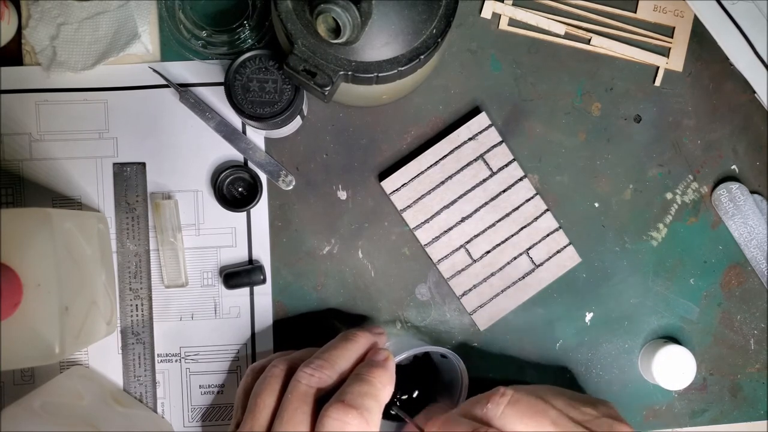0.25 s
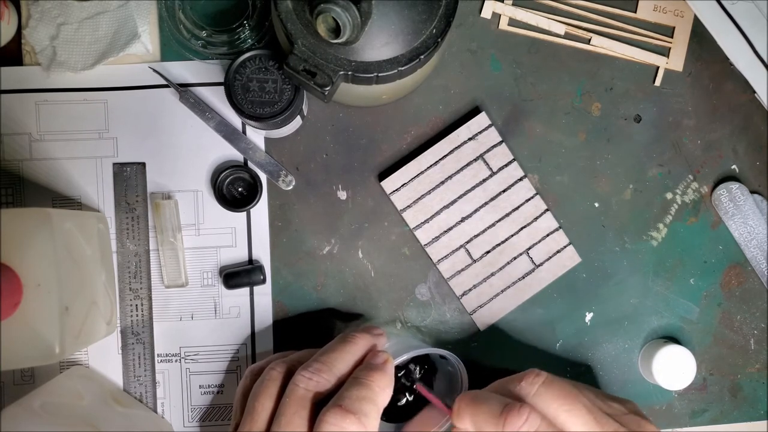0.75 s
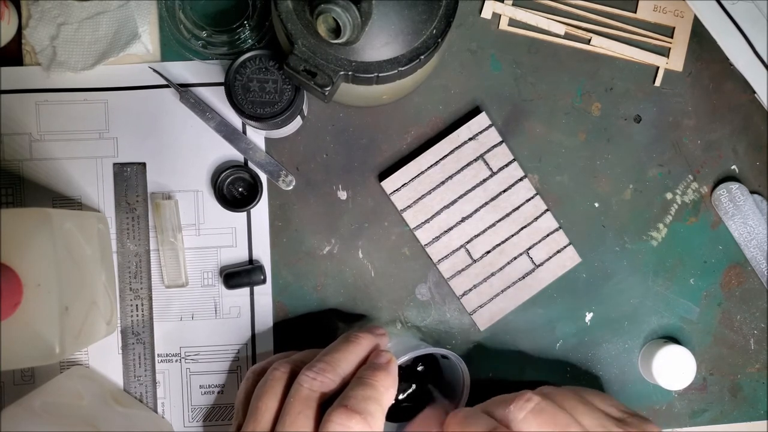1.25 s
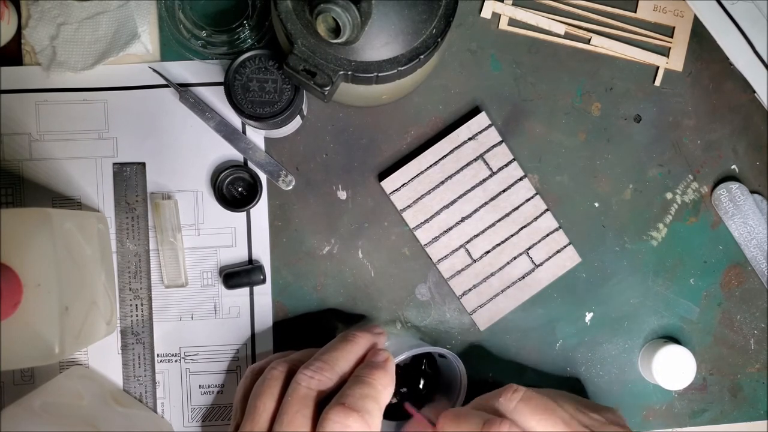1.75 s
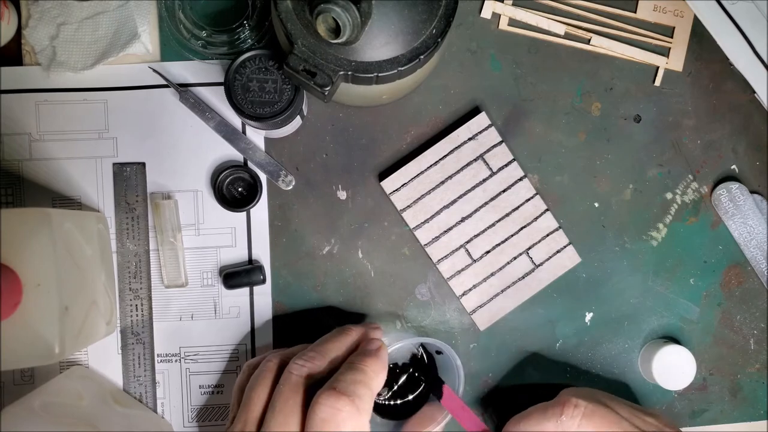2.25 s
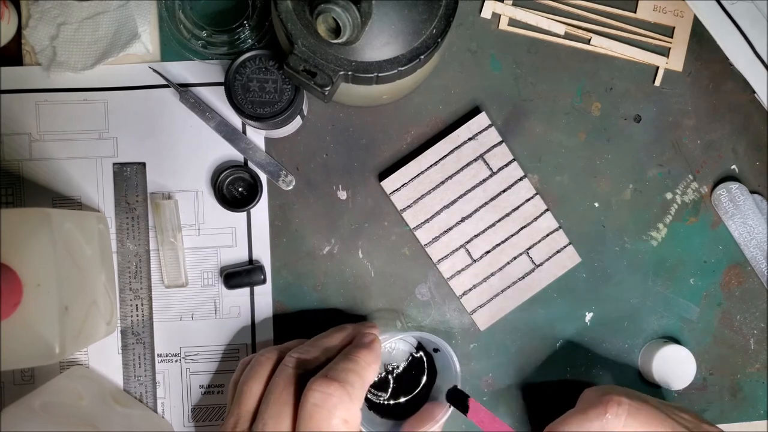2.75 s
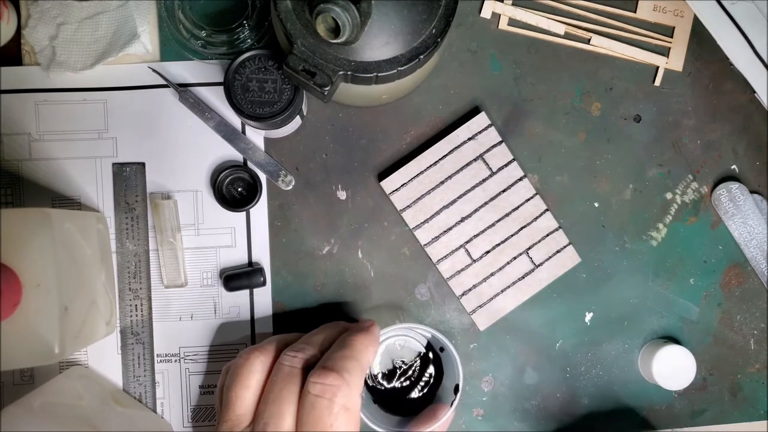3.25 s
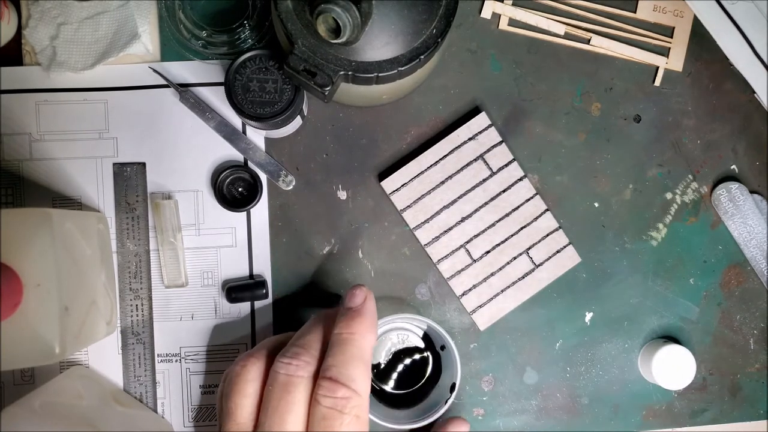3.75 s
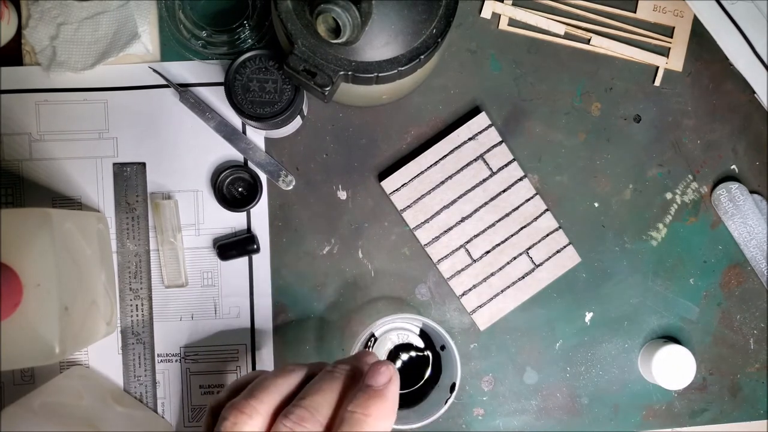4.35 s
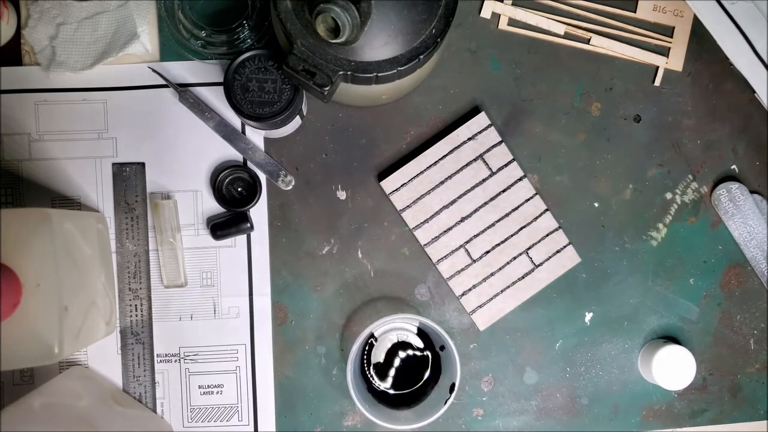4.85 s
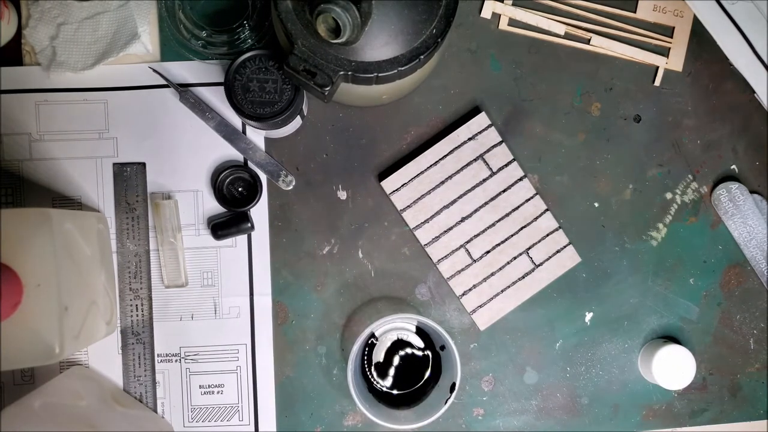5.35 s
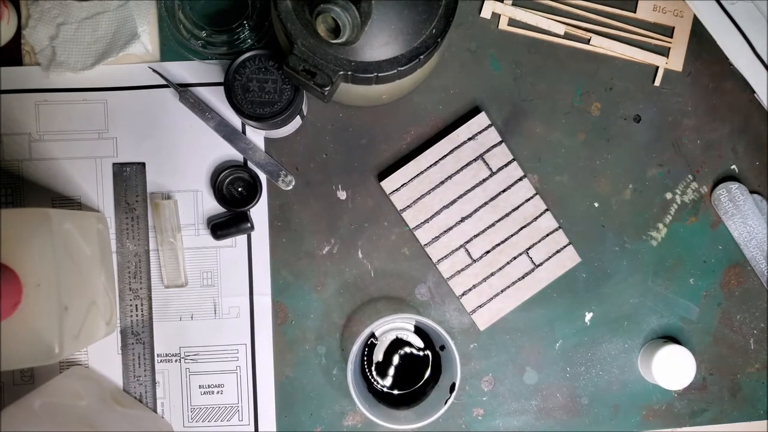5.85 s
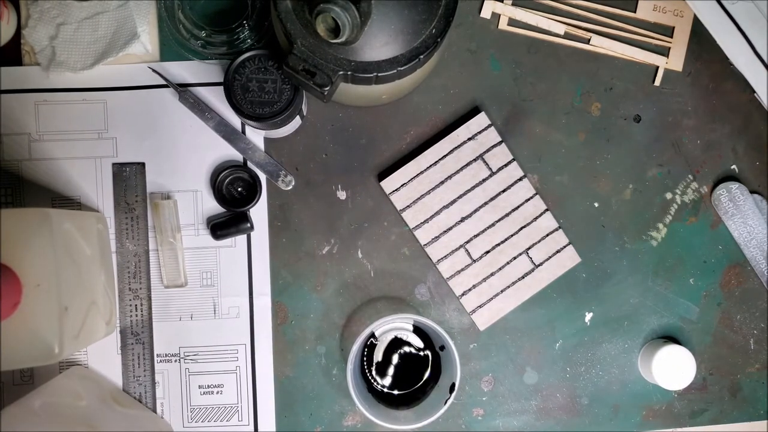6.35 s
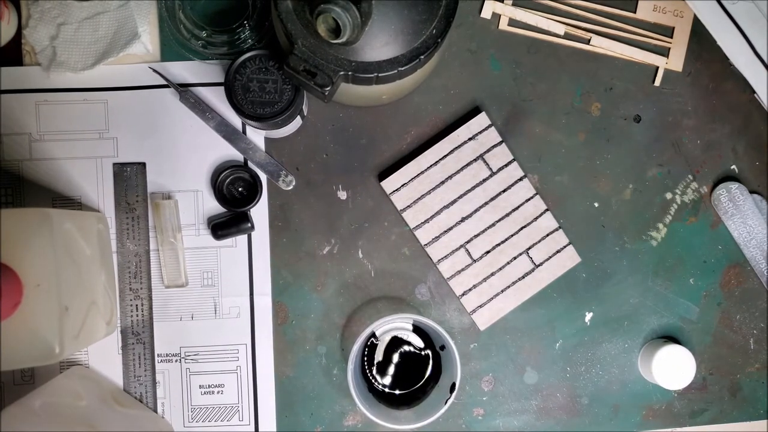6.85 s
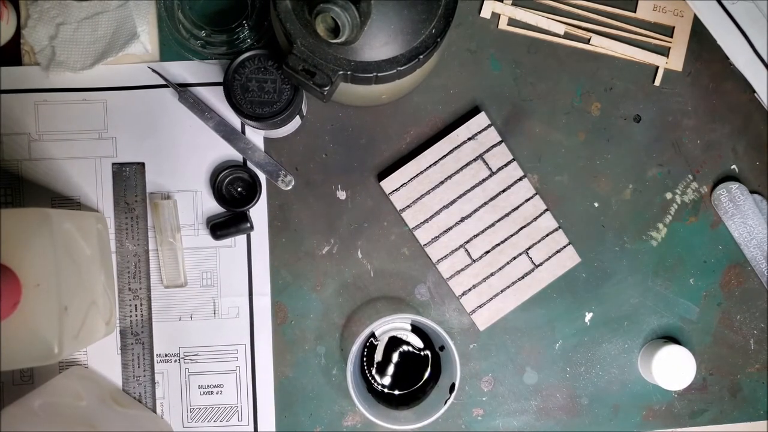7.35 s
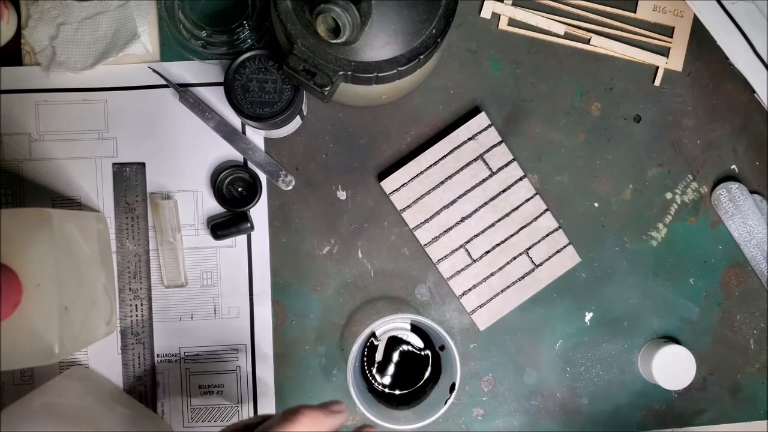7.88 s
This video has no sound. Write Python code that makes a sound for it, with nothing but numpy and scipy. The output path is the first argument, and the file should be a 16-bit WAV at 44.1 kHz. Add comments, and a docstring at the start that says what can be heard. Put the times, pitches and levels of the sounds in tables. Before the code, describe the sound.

Over the low, steady hum of a fan in a small workshop, a stirring stick knocks unevenly against a plastic paint cup close to the microphone. The tapping thins out and the stick lands with a sharp clack. After a short hollow click, small hard tools click on the left, and an object is put down on the bench with dull knocks, soft thumps and a slight metallic rattle.

```python
"""Stirring paint at the workbench

A stick stirs paint in a small plastic cup: damped pocks on wall and bottom, a wipe on the rim, then
a bounce as it is laid down. After a short, hollow click, small tools tick and something is set down
with a few dull knocks that ring the bench. Brief hisses swell, arms rock the bench top, and a faint
whine passes early on. A ventilation fan hums steadily in the small workshop."""
import sys
import numpy as np
from scipy import signal
from scipy.fft import rfft, irfft, next_fast_len
from scipy.io import wavfile

SR = 44100
rng = np.random.default_rng(int(sys.argv[2]) if len(sys.argv) > 2 else 0)


def log_audio(samples):
    """Write samples as a 16-bit WAV file to the path given in sys.argv[1]."""
    # one column per channel
    frames = np.atleast_2d(samples).T
    # limit to full scale, then quantise
    limited = np.clip(frames, -1, 1)
    pcm = np.round(limited * 32767).astype(np.int16)
    wavfile.write(sys.argv[1], SR, pcm)


N = 357856
TIME = np.arange(N) / SR
SHOT = TIME[:SR * 3 // 5]   # time axis of a one-shot, 0.6 s
ECHO_ONSET = np.clip(SHOT / .003 - 1, 0, 1)   # 3 ms of pre-delay, then a 3 ms fade-in


# the cup's body: f/Hz, swell/ms, level/dB when struck on the wall, on the bottom, on the rim
CUP_MODES = [(765, 1.2, -15.5, 1.5, -2.5), (1330, 1.06, -18.5, -6, -9), (1907, 1.53, -2.5, -9.5, -15),
             (2600, 1.3, -19, -24, -7), (3170, 2.4, -28, -40, -28)]
# the stick meets the wall, about four strokes a second; the spot sets the pitch, the grip the length:
# t/s, level/dB, tick against pock/dB, pitch ratio, length ratio
WALL_TAPS = [(0.1592, -22, -24, 0.89, 0.6), (0.2522, -49.5, -14, 1.02, 1.2),
             (0.3424, -18.5, -14, 0.95, 0.85), (0.3517, -28, -37, 0.95, 1.6),
             (0.4413, -34, -23, 0.97, 0.49), (0.634, -47, -3.5, 1.05, 0.5),
             (0.6381, -29.5, -30, 0.98, 0.98), (0.871, -55, -16, 0.93, 0.84),
             (1.033, -46.5, -18, 0.94, 1.8), (1.0634, -34, -5, 0.92, 1.4), (1.305, -35.5, -23, 0.97, 0.83),
             (1.5316, -35.5, -7.5, 1.01, 0.74), (1.725, -49, -35, 0.94, 1.6),
             (1.754, -48.5, -22, 0.97, 1.3), (1.933, -34.5, -19, 0.9, 0.95), (1.9721, -34, -14, 0.9, 0.51)]
# it lands on the bottom, under the paint: same columns
BOTTOM_TAPS = [(0.4641, -37.5, -14.5, 1.06, 0.71), (1.533, -45.5, -14, 0.94, 0.77),
               (1.544, -48, -25, 1.1, 1.15), (1.758, -48.5, -23, 0.7, 0.89), (1.953, -35, -15.5, 1.02, 1)]
# light touches on the rim as the stick is wiped and the cup nudged: same columns
RIM_TAPS = [(2.293, -58.5, 2.5, 0.91, 2.2), (2.321, -49.5, 0, 0.96, 1.9), (2.989, -51, -0.5, 0.98, 2.3),
            (3.141, -55, -16, 0.88, 1.9), (3.379, -63, 4.5, 0.63, 2.1), (3.43, -70.5, 11, 1.3, 1.3),
            (5.306, -54.5, -1, 0.78, 1.3)]

def cup_taps(trim_db=-2, pan_db=3.5):
    """Hand and paint damp the cup: each tap is a short pock with a hard tick. Returns both stems."""
    pocks, ticks = np.zeros((2, 2, N))
    mode_hz, swell_ms, *spot_db = np.transpose(CUP_MODES)
    low_cuts_hz = (950, 430, 400)   # the stiff wall gives less body than the bottom
    for taps, mode_db, low_hz in zip((WALL_TAPS, BOTTOM_TAPS, RIM_TAPS), spot_db, low_cuts_hz):
        for s, db, tick_db, pitch, length in taps:
            body = sum(from_db(gain_db) * damped_swing(hz * pitch, ms * length, rng.uniform(0, 2 * np.pi))
                       for hz, ms, gain_db in zip(mode_hz, swell_ms, mode_db))
            pock = band(body, low_hz, SR / 2, order=3)
            wall_ring = from_db(4) * resonate(pock, hz=1180, width_hz=130)   # the thin wall rings on
            pock = scatter(pock + wall_ring, early_db=-8, early_s=0.006)
            tick = resonate(contact(decay_s=0.0018)[0], hz=2400, width_hz=1600)
            tick = peak_one(band(tick, 600, 6000, order=3))
            tick = scatter(tick, early_db=-2.5, early_s=0.012)
            add(pocks, s, from_db(trim_db + db) * pock, pan_db)
            add(ticks, s, from_db(trim_db + db + tick_db) * tick, pan_db)
    return pocks, ticks


# stick or finger drags on the cup: centre t/s, half length/s, level/dB
SCRAPES = [(0, 0.074, -65), (.395, 0.036, -50.5), (1.06, 0.0028, -51), (2.33, 0.028, -72),
           (5.315, 0.012, -62.5)]
# the cup's hollow colour under a drag: f/Hz, width/Hz, level/dB
SCRAPE_MODES = [(1084, 210, -5.5), (2010, 200, -1.5), (2520, 530, -10.5)]

def cup_scrapes(grain_db=4):
    """Dragging sends tiny catches through the cup's hollow resonances."""
    catches = rng.standard_normal((2, N)) * from_db(grain_db * rng.standard_normal(N))
    hollow = sum(from_db(db) * rms_one(resonate_twice(catches, hz, width))
                 for hz, width, db in SCRAPE_MODES)
    out = np.zeros((2, N))
    add(out, 0, swells(SCRAPES) * hollow, pan_db=3)
    return out


# the stick's bounces: t/s, level/dB, pan left/dB, pitch ratio
STICK_HITS = [(3.2119, -22.5, 4.5, 0.96), (3.2141, -37, 8, 0.77), (3.2195, -40, -6, 1)]
# the bare stick's body: f/Hz, width/Hz, level/dB
STICK_MODES = [(656, 230, -6), (1560, 570, 3), (2620, 360, 0), (3270, 440, 1), (4400, 1300, -6),
               (5500, 800, 10.5), (6250, 1100, 6), (7610, 1600, 4), (13000, 1500, -9), (16000, 1400, -9)]

def stick_drop():
    """The bare stick drops on the bench and bounces with a bright clack."""
    return clicks(STICK_HITS, STICK_MODES, snap_db=-22.5, snap_s=0.018, snap_hz=(600, 15000),
                  early_db=-3.0, early_s=0.034)


# the bench and what stands on it: f/Hz, undamped t60/s, level/dB under a knock, under a light touch
BENCH_MODES = [(168.7, 0.36, -2.5, 0.5), (229, 0.11, 2.5, -33), (263.4, 0.092, 6, -28),
               (294.5, 0.15, 2, -26), (374, 0.05, -2.5, -11), (409, 0.24, 0.5, -10), (456, 0.093, 5, 6.5),
               (463.6, 0.13, 2, -20), (642, 0.086, -8.5, -18), (780, 0.07, -2.5, -0.5),
               (833, 0.07, -2.5, -1.5), (992, 0.21, -26, -18), (1140, 0.11, -11.5, -16),
               (1238, .2, -13, -23), (1333, 0.25, -18, -13), (1470, 0.071, -6, -1)]
# knocks on the bench: t/s, level/dB, low-end weight/dB, decay under the hand/s, rattle level/dB
KNOCKS = [(5.307, -48, -8, 0.055, -73), (5.711, -35, 4, 0.021, -53), (5.7175, -27.5, 7.5, 0.031, -64),
          (7.0846, -23.5, -4.5, 0.057, -44), (7.091, -24.5, 2, 0.09, -54), (7.128, -36.5, 8, 0.15, -86)]
# how far up a knock's weight reaches: f/Hz, share
WEIGHT_REACH = [(200, 1), (450, 0.99), (700, 0.28)]
# a loose metal part that hard knocks set rattling: f/Hz, width/Hz, level/dB
METAL_MODES = [(3050, 92, 19), (3440, 240, 24), (6100, 170, 1), (7200, 100, -16.5), (7940, 150, -60),
               (9700, 200, -51), (12200, 230, -28)]

def bench_knocks(softening=0.19):
    """Each knock rings the bench over a short, dull crack and rattles a loose metal part."""
    out = np.zeros((2, N))
    hz, t60, knock_db, _ = np.transpose(BENCH_MODES)
    reach = at_hz(WEIGHT_REACH, hz)
    for s, db, weight_db, damped_s, metal_db in KNOCKS:
        crack = from_db(1) * peak_one(band(contact(decay_s=0.03, alike=0.42), 110, 1500, order=10))
        attack_s = 0.0016 * from_db(softening * weight_db)   # heavy knocks stay in contact longer
        body = ring(hz, knock_db + weight_db * reach, t60)
        wood = peak_one((body + crack) * fade_in(attack_s)) * np.exp(-SHOT / damped_s)
        rattle = contact(decay_s=0.011)
        metal = sum(from_db(mode_db) * rms_one(resonate(rattle, mode_hz, width))
                    for mode_hz, width, mode_db in METAL_MODES)
        knock = from_db(db) * wood + from_db(metal_db) * peak_one(metal)
        add(out, s, scatter(knock, early_db=-4.5, early_s=0.011, alike=0.72), pan_db=0.5)
    return out


# light touches before the object is set down: t/s, level/dB, weight below 600 Hz/dB
TOUCHES = [(6.885, -37, -3), (7.001, -41, -20)]

def bench_touches(attack_s=0.0026, held_s=0.05):
    """A light touch draws a few clear, quickly damped notes from the bench."""
    out = np.zeros((2, N))
    hz, t60, _, touch_db = np.transpose(BENCH_MODES)
    for s, db, weight_db in TOUCHES:
        notes = ring(hz, touch_db + weight_db * (hz < 600), t60)
        touch = peak_one(notes * fade_in(attack_s) * np.exp(-SHOT / held_s))
        add(out, s, from_db(db) * scatter(touch, early_db=0, early_s=0.019, alike=1.0))
    return out


# the hollow click's two transients: t/s, level/dB, pan left/dB, pitch ratio
HOLLOW_HITS = [(4.6678, -31.5, 0, 1), (4.6697, -43, -9, 0.78)]
# its resonances: f/Hz, width/Hz, level/dB
HOLLOW_MODES = [(680, 190, 12), (1800, 430, 12), (3050, 750, 2.5), (4330, 860, 3.5), (7170, 1100, 6),
                (8700, 500, -10), (11950, 880, 2.5), (14200, 2500, -3)]

def hollow_click():
    """A short, hollow click."""
    return clicks(HOLLOW_HITS, HOLLOW_MODES, snap_db=-17.5, snap_s=0.0092, snap_hz=(600, 9400),
                  early_db=-7.5, early_s=0.045)


# the tools' contacts: t/s, level/dB, pan left/dB, pitch ratio
TOOL_HITS = [(5.7152, -44.5, 15.5, 1.065), (5.744, -51.5, 12, 0.67), (6.1328, -32, 8.5, 0.98),
             (6.135, -45, 9, 1.1), (6.146, -59, 14, 1.03), (7.0885, -47.5, 22, 1.03)]
# the tools' bodies: f/Hz, width/Hz, level/dB
TOOL_MODES = [(1360, 220, 3.5), (3210, 330, 9.5), (5300, 830, -6), (7310, 1200, 4.5), (8600, 1640, -8),
              (10360, 450, 2.5), (12300, 830, 0.5), (14400, 970, -1.5)]

def tool_clicks():
    """Small hard tools click crisply on the left as they are handled."""
    return clicks(TOOL_HITS, TOOL_MODES, snap_db=-21, snap_s=0.022, snap_hz=(2500, 14400),
                  early_db=-6.5, early_s=0.035)


# arms lean and shift on the bench: centre t/s, half length/s, level/dB
LEANS = [(2.44, 0.079, -45), (3.3, 0.079, -56), (5.33, 0.11, -47.5), (5.68, 0.14, -48), (7.22, 0.24, -43)]
# soft thuds in the bench top: t/s, level/dB, f/Hz
THUDS = [(2.604, -34, 67.3), (5.235, -40.5, 62), (5.713, -32, 56.5), (5.775, -35.5, 80.6), (5.837, -38, 76),
         (6.104, -34, 110), (6.938, -32.5, 72.6), (7.122, -26, 66), (7.174, -26, 75), (7.253, -27, 63.3),
         (7.371, -32, 59)]

def bench_rocking(twist_rad=0.55):
    """Arms and hands rock the bench top: low rumble and soft thuds, out of step at the two sides."""
    rumble = rms_one(band(rng.standard_normal((2, N)), 26, 64))
    out = swells(LEANS) * rumble
    phase = twist_rad * np.array([[1], [-1]])
    for s, db, hz in THUDS:
        add(out, s, from_db(db) * damped_swing(hz, swell_ms=10.7, phase=phase))
    return out


# light sliding noises and brief high hisses: # centre t/s, half length/s, level/dB, low cut/Hz, high cut/Hz
HISSES = [(1.064, 0.012, -68.5, 2800, 6900), (2.128, 0.014, -70, 4580, 14000),
          (2.322, 0.017, -73.5, 4000, 14000), (3.085, 0.028, -72, 6200, 8300),
          (3.13, 0.014, -67, 4870, 16000), (3.183, 0.048, -67.5, 5300, 15000),
          (3.365, 0.065, -76.5, 7000, 16100), (4.491, 0.047, -69, 2500, 8550),
          (4.537, .018, -73.5, 3950, 15800), (5.157, 0.014, -71, 2000, 10600),
          (5.21, 0.029, -78, 3000, 7800), (5.313, 0.013, -69, 3460, 11500), (6.894, 0.011, -78, 5000, 9000),
          (7.485, 0.015, -67, 4020, 8900)]

def hisses(grain_db=3.0, jerk_db=4.5, jerks_per_s=110):
    """Each hiss is a jerky stream of tiny grains that swells and fades in its own band."""
    out = np.zeros((2, N))
    size, middle = len(SHOT), SHOT.mean()
    for s, half_s, db, low_hz, top_hz in HISSES:
        jerks = np.interp(SHOT * jerks_per_s, np.arange(size), rng.standard_normal(size))
        noise = rng.standard_normal((2, size))
        grains = noise * from_db(grain_db * rng.standard_normal(size) + jerk_db * jerks)
        swell = np.exp(-((SHOT - middle) / half_s) ** 2 / 2)
        add(out, s - middle, from_db(db) * swell * rms_one(band(grains, low_hz, top_hz)))
    return out


# the whine's path: t/s, f/Hz, level/dB
WHINE = [(.6, 12200, -105), (0.632, 11900, -83), (.74, 12100, -84), (.79, 12800, -105), (.87, 13000, -84),
         (.96, 13200, -105)]

def whine():
    """A faint, very high tone glides up and fades."""
    s, hz, db = np.transpose(WHINE)
    gain = np.sqrt(2) * np.interp(TIME, s, from_db(db), left=0, right=0)
    cycles = np.cumsum(np.interp(TIME, s, hz)) / SR
    return gain * np.sin(2 * np.pi * cycles)


# the bed of fan and room air: f/Hz, density/(dB per Hz)
AIR_SPECTRUM = [(25, -76), (50, -82.5), (75, -81.5), (150, -86), (230, -85), (300, -91.5), (550, -89),
                (750, -99.5), (1000, -105), (1600, -106), (2600, -118), (4600, -118), (5800, -124),
                (9800, -132), (13000, -119.5)]
# duct resonances: f/Hz, width/Hz, level/dB
DUCT_MODES = [(85.1, 25.7, -53), (105.6, 10.4, -53), (115.1, 13.2, -54.5), (175.2, 10, -60.5),
              (435.3, 32, -70), (536.4, 70, -75)]
# the fan's hum: f/Hz, level/dB
FAN_TONES = [(102.2, -62), (178, -74.5), (350, -73), (425.3, -80), (720.5, -83)]

def fan():
    """The fan's flow hisses and keeps the duct droning under a few steady tones."""
    air = diffuse_noise(AIR_SPECTRUM)
    flow = np.tile(diffuse_noise(), 2)[:, N - SR // 2:]   # half a second of pre-roll
    drone = sum(from_db(db) * rms_one(resonate_twice(flow, hz, width)[:, -N:])
                for hz, width, db in DUCT_MODES)
    hum = sum(np.sqrt(2) * from_db(db) * np.sin(2 * np.pi * (hz * TIME + rng.random()))
              for hz, db in FAN_TONES)
    return air + drone + hum


# the room's stereo image: f/Hz, left-right correlation
LIKENESS = [(30, 0.9), (70, 0.96), (130, 0.98), (300, 0.85), (700, 0.41), (1500, 0.013), (4000, 0.01),
            (15000, 0.0087)]

def diffuse_noise(spectrum=None):
    """Room-filling noise, white or shaped, centred in the bass and wide in the treble."""
    size = next_fast_len(N, real=True)
    hz = np.fft.rfftfreq(size, 1 / SR)
    alike = at_hz(LIKENESS, hz)
    gain = 1 if spectrum is None else from_db(at_hz(spectrum, hz)) * np.sqrt(SR) / 2
    mid, side = gain * rfft(rng.standard_normal((2, size)))
    return irfft(np.sqrt(1 + alike) * mid + np.sqrt(1 - alike) * side * [[1], [-1]], size)[:, :N]


# the workshop's reverb: f/Hz, t60/s
ROOM_T60 = [(150, 0.43), (700, 0.62), (2000, 0.52), (5500, 0.36), (9000, 0.63), (15000, 0.11)]

def room(send):
    """The workshop's reverb dies band by band, centred in the bass."""
    edges_hz = np.geomspace(60, 18000, 10)
    tail = 0
    for low, high in zip(edges_hz, edges_hz[1:]):
        hz = np.sqrt(low * high)
        decay_s = at_hz(ROOM_T60, hz) / np.log(1000)
        tail = tail + band(contact(decay_s, at_hz(LIKENESS, hz)), low, high)
    return reflect(send, tail)


def scatter(sound, early_db, early_s, alike=0.36):
    """Add quick reflections from the cluttered bench, different for every spot that is struck."""
    stereo = sound * np.ones((2, 1))
    return stereo + from_db(early_db) * reflect(stereo, contact(early_s, alike))


def reflect(sound, tail):
    """The wet signal of an echo tail, leaning a little to the side of its source."""
    response = rms_one(tail * ECHO_ONSET) / np.sqrt(len(SHOT))
    narrowed = (sound + sound.mean(axis=0)) / 2
    return signal.oaconvolve(narrowed, response, axes=1)[:, :sound.shape[1]]


def clicks(hits, modes, snap_db, snap_s, snap_hz, early_db, early_s):
    """Each hit is an impulse ringing wide resonances, with a short noisy snap on top; both get quick
    reflections."""
    out, pulse = np.zeros((2, N)), signal.unit_impulse(len(SHOT))
    for s, db, pan_db, pitch in hits:
        body = sum((-1) ** k * from_db(mode_db) * resonate_twice(pulse, hz * pitch, width)
                   for k, (hz, width, mode_db) in enumerate(modes))
        snap = from_db(snap_db) * peak_one(band(contact(snap_s), *snap_hz))
        add(out, s, from_db(db) * scatter(peak_one(body) + snap, early_db, early_s), pan_db)
    return out


def ring(hz, db, t60, spread_db=2, spread_rad=0.68):
    """Modes decay freely, a little different on each blow and at each side."""
    hz, db, t60 = np.array([hz, db, t60])[:, :, None, None]
    strength = from_db(db + spread_db * rng.standard_normal(hz.shape))
    quarter_turns = np.pi / 2 * np.arange(len(hz))[:, None, None]
    phase = quarter_turns + spread_rad * rng.standard_normal((len(hz), 2, 1))
    decay = np.exp(-np.log(1000) * SHOT / t60)
    return (strength * decay * np.sin(2 * np.pi * hz * SHOT + phase)).sum(axis=0)


def damped_swing(hz, swell_ms, phase):
    """A heavily damped body swings up and dies within a few cycles."""
    age = SHOT * 1000 / swell_ms
    return age ** 2 * np.exp(2 * (1 - age)) * np.sin(2 * np.pi * hz * SHOT + phase)


def contact(decay_s, alike=1.0):
    """A decaying noise burst, as from one rough contact; alike runs from 0 (wide) to 1 (mono)."""
    shared, own = rng.standard_normal(len(SHOT)), rng.standard_normal((2, len(SHOT)))
    return (np.sqrt(alike) * shared + np.sqrt(1 - alike) * own) * np.exp(-SHOT / decay_s)


def fade_in(attack_s):
    """The rounded attack of a soft contact."""
    return 1 - np.exp(-(SHOT / attack_s) ** 2)


def swells(rows):
    """Envelope of movements that rise and fade, each a bell around its centre."""
    return sum(from_db(db) * np.exp(-((TIME - s) / half_s) ** 2 / 2) for s, half_s, db in rows)


def resonate(x, hz, width_hz):
    """A two-pole resonance with unity gain at its peak."""
    r = np.exp(-np.pi * width_hz / SR)
    poles = [1, -2 * r * np.cos(2 * np.pi * hz / SR), r * r]
    return signal.lfilter(np.array([1, 0, -1]) * (1 - r * r) / 2, poles, x + 1e-18)


def resonate_twice(x, hz, width_hz):
    """Two resonances in series, each width_hz wide, for steeper skirts."""
    return resonate(resonate(x, hz, width_hz), hz, width_hz)


def band(x, low_hz, high_hz, order=2):
    """Butterworth band-pass."""
    sos = signal.butter(order, [low_hz, min(high_hz, SR / 2 - 500)], "band", fs=SR, output="sos")
    return signal.sosfilt(sos, x + 1e-18)


def at_hz(points, hz):
    """Read a table on a log-frequency axis."""
    known_hz, values = np.transpose(points)
    return np.interp(np.log(np.maximum(hz, 1)), np.log(known_hz), values)


def from_db(db):
    """Decibels to gain."""
    return 10 ** (np.asarray(db) / 20)


def rms_one(x):
    """Scale to an rms of 1."""
    return x / np.sqrt(np.mean(x ** 2) + 1e-20)


def peak_one(x):
    """Scale to a peak of 1."""
    return x / (np.abs(x).max() + 1e-20)


def add(track, s, sound, pan_db=0):
    """Mix a sound into a stereo track at time s; positive pan is left."""
    start = max(round(s * SR), 0)
    piece = (sound * from_db([[pan_db / 2], [-pan_db / 2]]))[:, :N - start]
    track[:, start:start + piece.shape[1]] += piece


def off_centre(x, lag_ms):
    """A sound from one side arrives later (or, if negative, sooner) on the left."""
    return np.array([np.roll(x[0], round(lag_ms * SR / 1000)), x[1]])


def scene():
    """The cup is close and fairly dry; its ticks, the bench and the hisses carry more room."""
    pocks, ticks = cup_taps()
    stems = [(off_centre(pocks, lag_ms=-.05), -16),   # stem, reverb send/dB
             (off_centre(ticks, lag_ms=-.05), -12),
             (off_centre(stick_drop(), lag_ms=-.36), -14.5),
             (off_centre(hollow_click(), lag_ms=.28), -17),
             (off_centre(tool_clicks(), lag_ms=-.4), -14),
             (off_centre(bench_knocks() + bench_touches(), lag_ms=-.12), -9.5),
             (hisses(), -5.5)]
    direct = sum(stem for stem, _ in stems)
    reverb = room(sum(from_db(send_db) * stem for stem, send_db in stems))
    return direct + reverb + bench_rocking() + cup_scrapes() + whine() + fan()


def record(dry):
    """A steep high cut at 16 kHz."""
    return signal.sosfilt(signal.ellip(10, .2, 70, 16000, fs=SR, output="sos"), dry)


dry = scene()
out = record(dry)
log_audio(out)
```